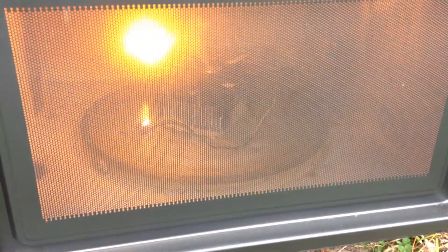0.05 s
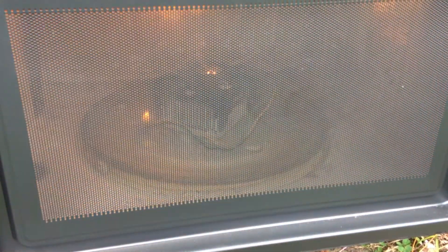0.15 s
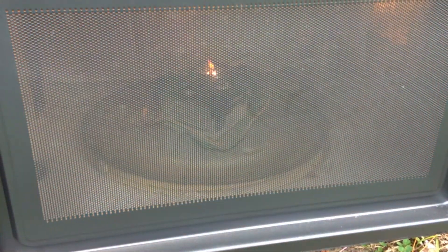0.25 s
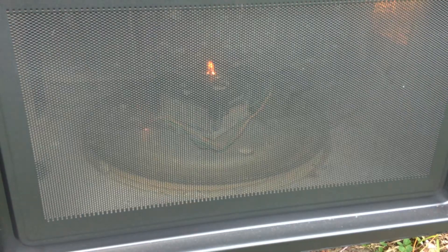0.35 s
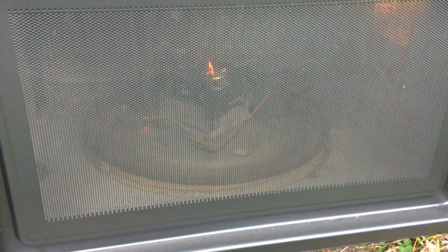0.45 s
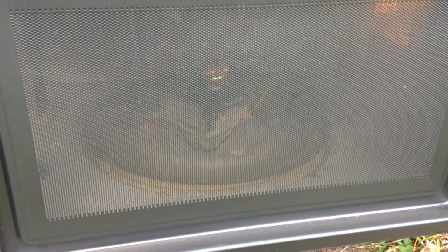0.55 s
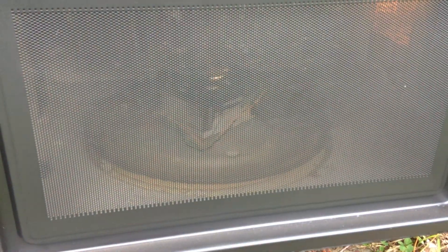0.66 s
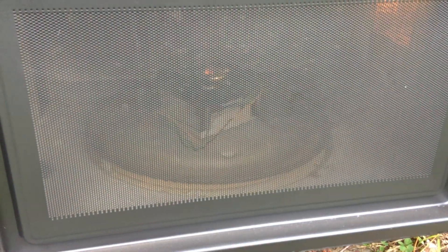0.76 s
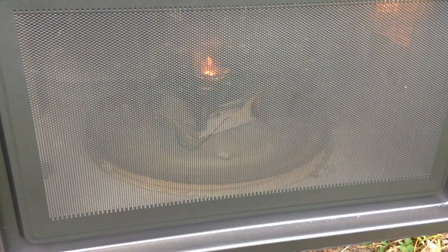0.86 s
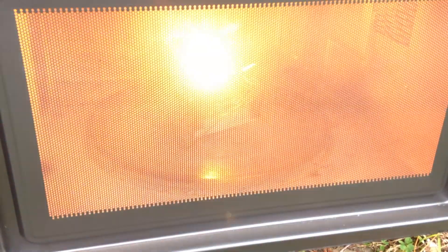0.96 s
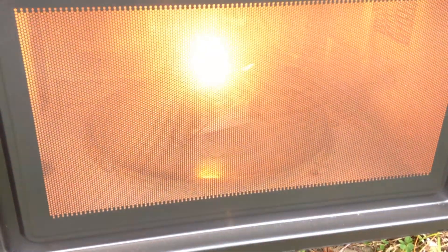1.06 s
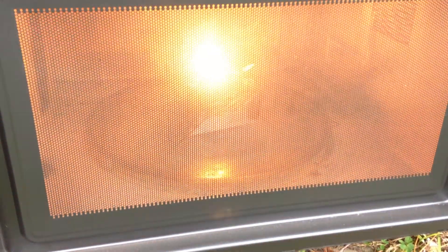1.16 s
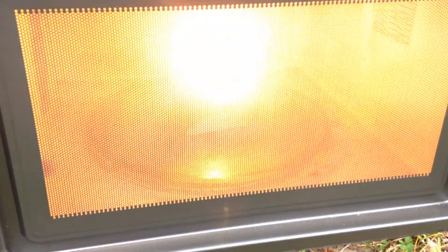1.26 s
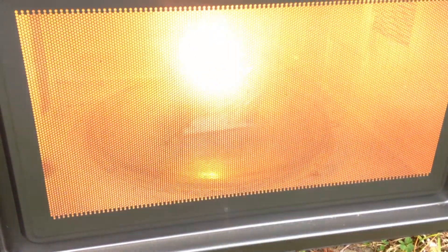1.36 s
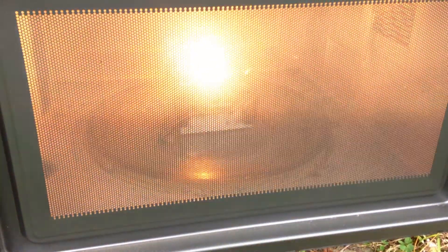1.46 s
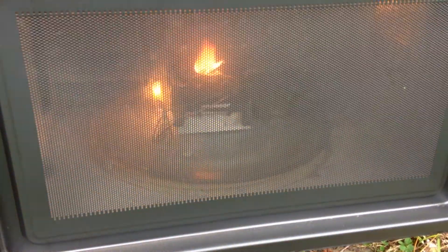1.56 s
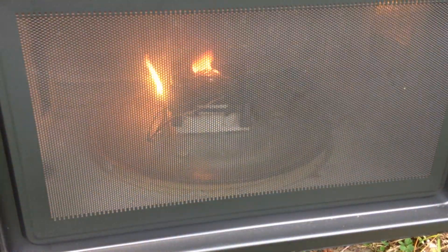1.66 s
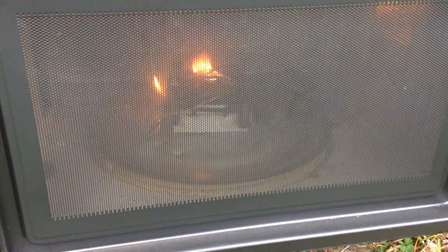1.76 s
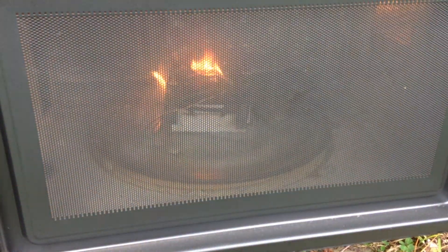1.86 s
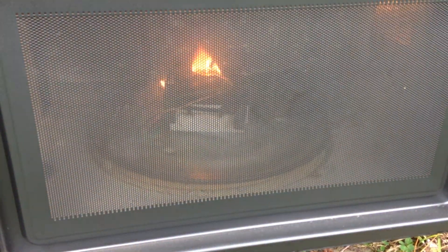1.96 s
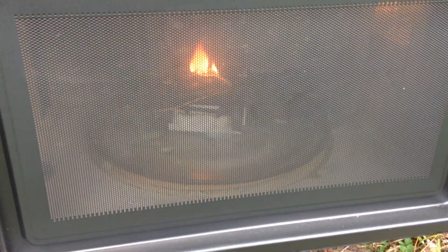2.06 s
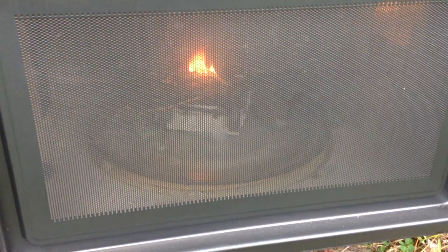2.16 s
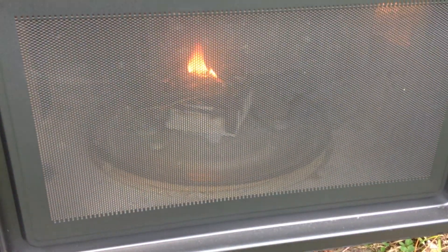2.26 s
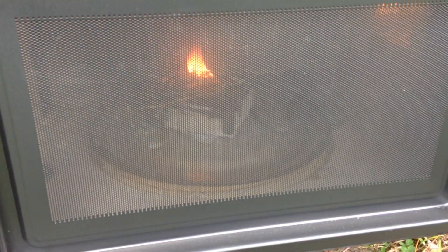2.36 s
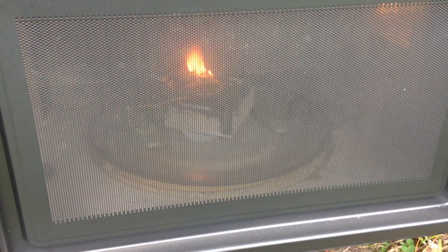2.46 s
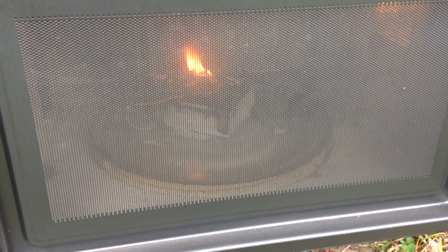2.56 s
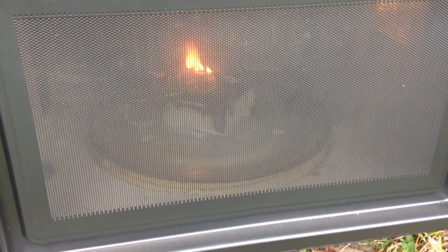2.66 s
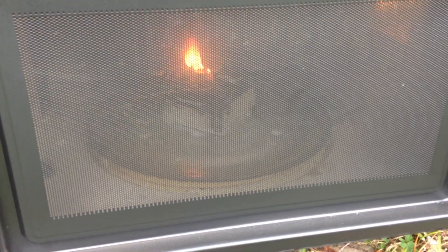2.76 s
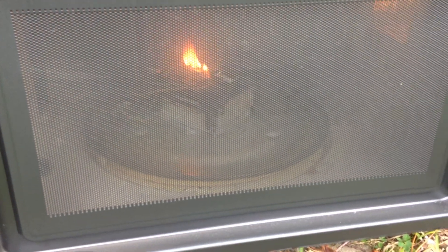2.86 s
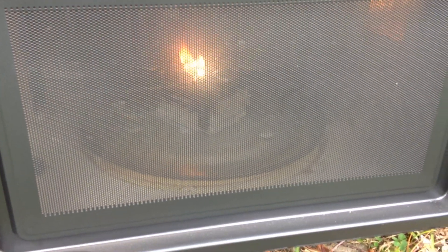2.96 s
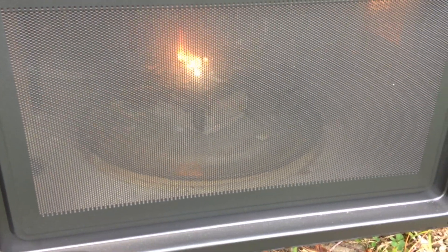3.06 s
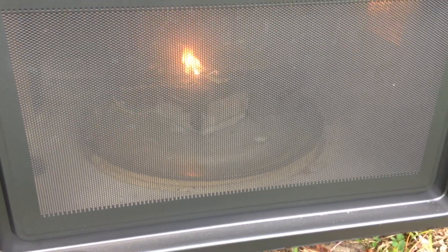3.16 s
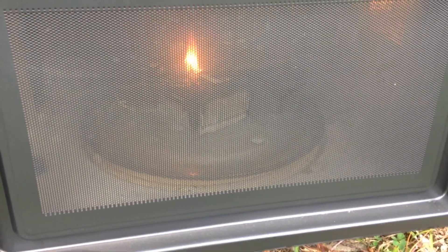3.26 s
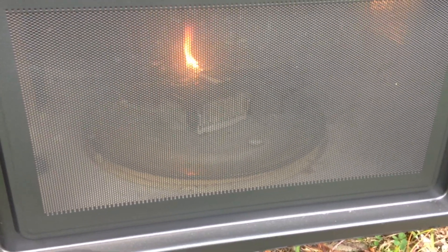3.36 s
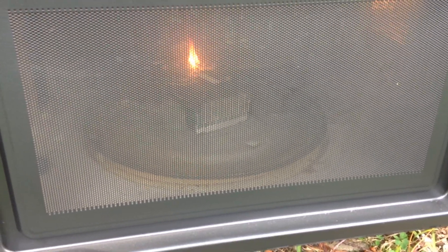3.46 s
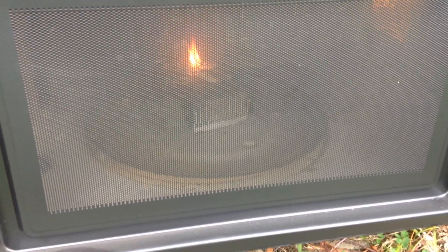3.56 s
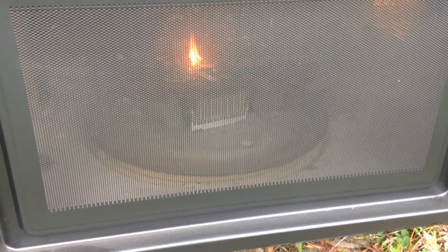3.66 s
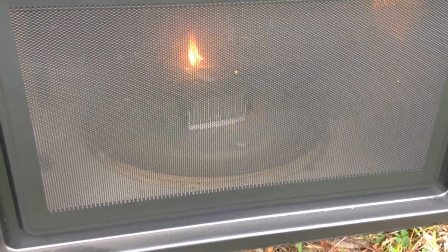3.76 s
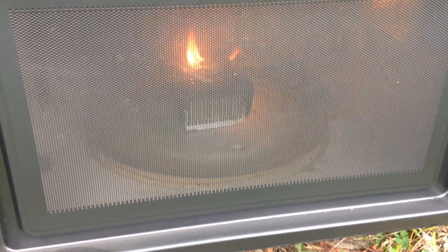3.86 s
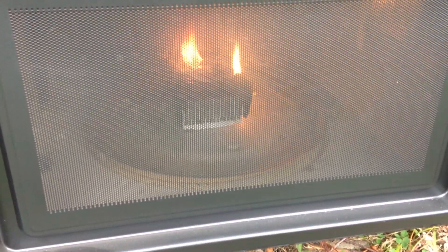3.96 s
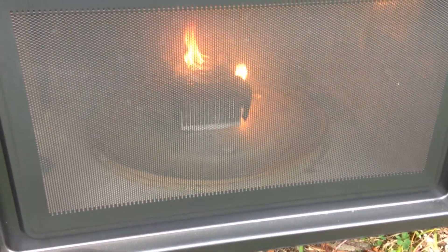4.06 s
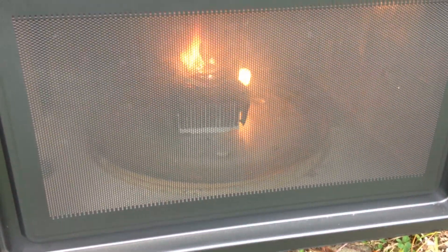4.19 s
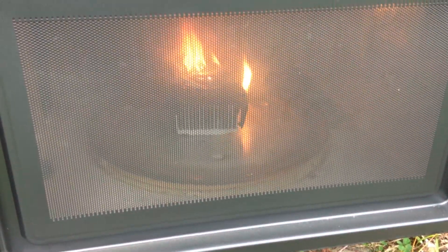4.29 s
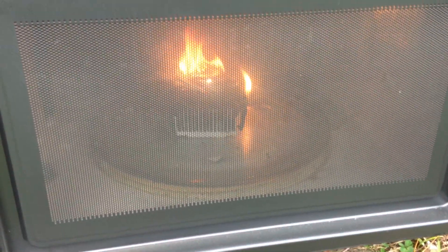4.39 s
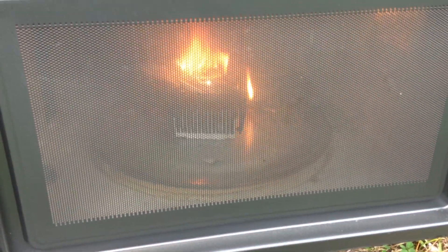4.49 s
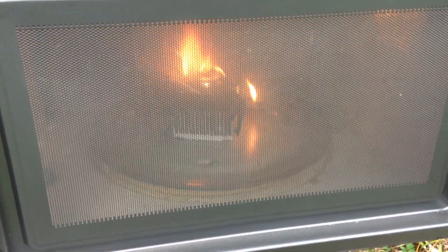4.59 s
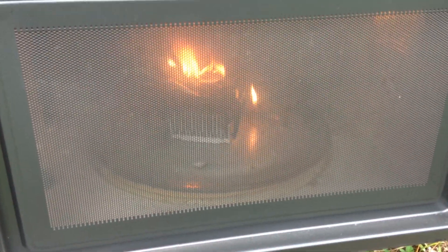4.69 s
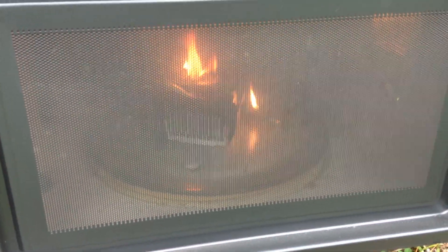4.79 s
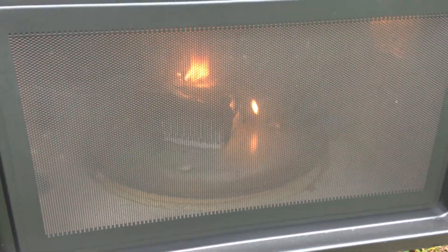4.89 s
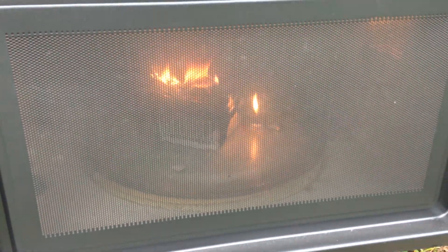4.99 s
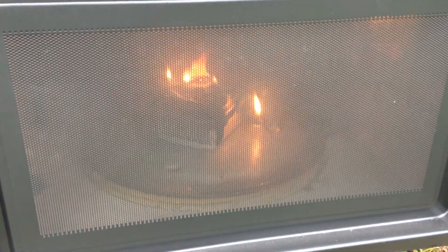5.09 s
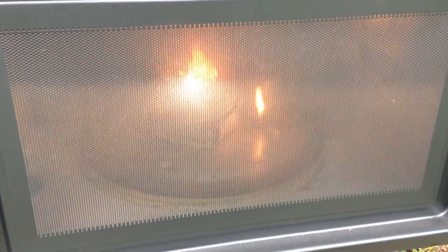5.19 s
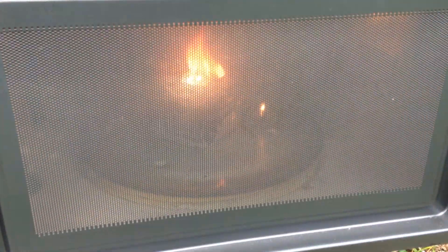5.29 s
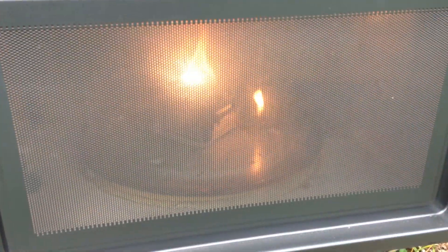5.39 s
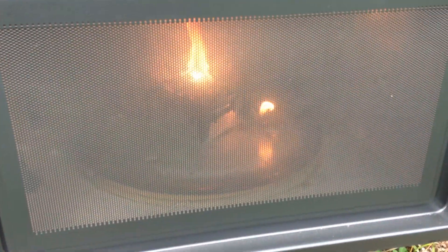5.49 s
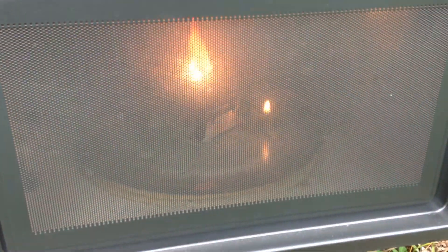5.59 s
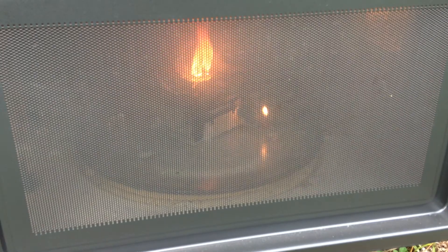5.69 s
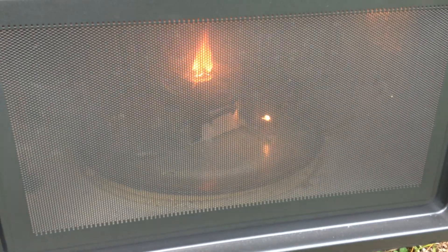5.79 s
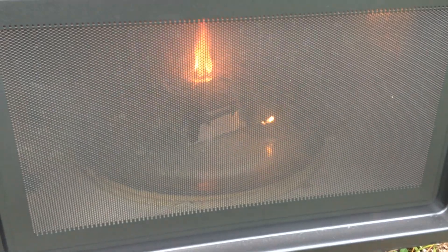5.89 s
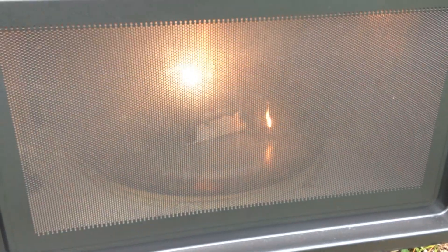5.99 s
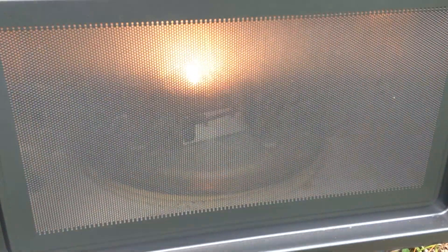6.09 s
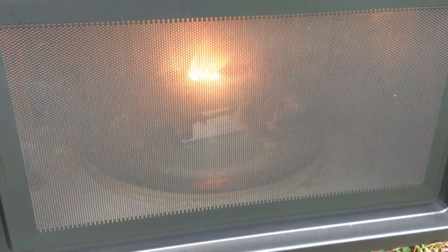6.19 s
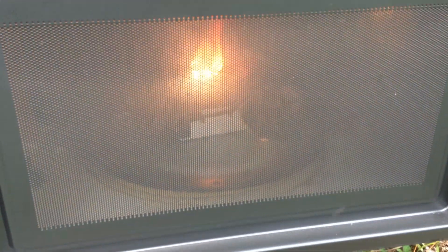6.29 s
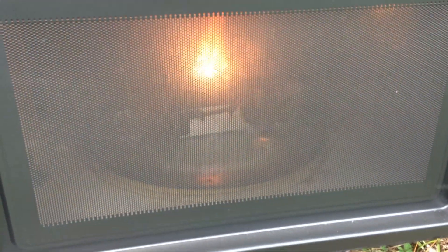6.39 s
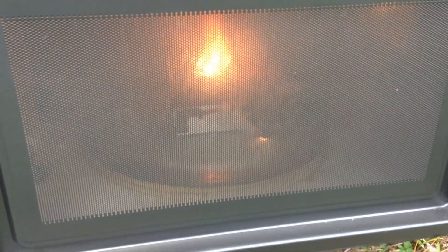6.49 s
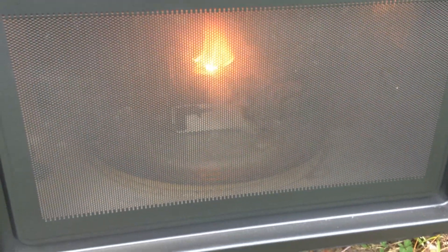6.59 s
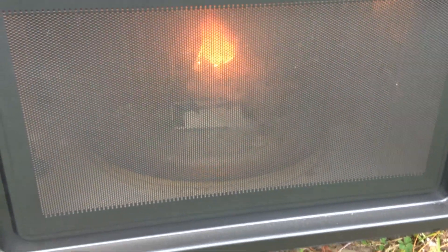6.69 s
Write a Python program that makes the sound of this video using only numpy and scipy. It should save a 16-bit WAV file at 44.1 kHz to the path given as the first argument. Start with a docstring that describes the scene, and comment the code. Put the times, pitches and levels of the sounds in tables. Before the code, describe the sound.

A microwave oven's low fan rumble under harsh buzzing electrical arcs that flare, fade, roar again, then shrink to faint sputters with one late snap.

```python
"""A microwave oven runs outdoors while metal inside it arcs and burns.
A fan rumbles and its blades whine faintly throughout. The arc opens with loud flares, fades at about
half a second, roars again from one second, then mostly sputters faintly; a burst at 5.2 s is the last strong one.
The arc is noise relit once in each mains cycle, ringing in a steel box. Its current loads the transformer,
whose hum and thumps rise and fall. Now and then gas ignites with a pop, a short dying swing."""
import sys
import numpy as np
from scipy import signal
from scipy.io import wavfile
from scipy.ndimage import uniform_filter1d

SR = 44100
rng = np.random.default_rng(int(sys.argv[2]) if len(sys.argv) > 2 else 0)


def log_audio(samples):
    """Write samples as a 16-bit WAV file to the path given in sys.argv[1]."""
    # one column per channel
    frames = np.atleast_2d(samples).T
    # limit to full scale, then quantise
    limited = np.clip(frames, -1, 1)
    pcm = np.round(limited * 32767).astype(np.int16)
    wavfile.write(sys.argv[1], SR, pcm)


N = 297278

MAINS_HZ = 60
STRIKE_TURN = .68  # share of a mains cycle at which the arc strikes


def gain_of(db):
    """Turns decibels into amplitude."""
    return 10 ** (np.asarray(db) / 20)


def evened(x):
    """Scales a signal to an rms (average strength) of 1."""
    return x / np.sqrt(np.mean(x ** 2) + 1e-20)


def read(points, hz):
    """Reads a curve between its points, on a log-frequency axis."""
    point_hz, value = np.transpose(points)
    return np.interp(np.log(hz + 1), np.log(point_hz + 1), value)


def colour(x, points):
    """Shapes the spectrum with a filter of energy 1 that responds as early as it can (minimum phase)."""
    hz = abs(np.fft.fftfreq(8192, 1 / SR))
    log_gain = np.log(gain_of(read(points, hz)))
    spectrum = np.exp(np.conj(signal.hilbert(log_gain)))
    taps = np.fft.ifft(spectrum).real[:4096]
    return signal.oaconvolve(x, taps / np.linalg.norm(taps))[:N]


def cycles():
    """Gives the number of the current strike, and the share of its cycle that has passed."""
    return np.divmod(np.arange(N) / SR * MAINS_HZ + 1 - STRIKE_TURN, 1)


def fan(patchy_db=1.5, level_db=-45.5):
    """Air noise of the fan over the faint outdoor hiss: random spectrum frames, drifting in patches."""
    # Shape of the air noise, set to its final level below: (frequency [Hz], relative level [dB per Hz])
    air_spectrum = [(25, -69), (60, -13.5), (105, -11), (140, 1.5), (170, -2), (230, -10.5), (340, -10),
                    (390, -17), (500, -15), (560, -23), (900, -25), (2000, -29.5), (3200, -39.5),
                    (6000, -43), (15800, -46)]
    frames = N // 512 + 5
    hz = np.fft.rfftfreq(2048, 1 / SR)
    real, imaginary, patches = rng.standard_normal((frames, len(hz), 3)).T
    patches = uniform_filter1d(patches, size=16, axis=0)  # smooth over frequency
    patches = evened(uniform_filter1d(patches, size=8, axis=1))  # and over time
    frame_db = read(air_spectrum, hz)[:, None] + patchy_db * patches
    spectrum = (real + 1j * imaginary) * gain_of(frame_db)
    noise = signal.istft(spectrum, nperseg=2048, noverlap=1536)[1][:N]
    return gain_of(level_db) * evened(noise)


def blade_tones():
    """Faint steady tones of the fan blades: plain sine waves."""
    # Pitch of each blade tone: (frequency [Hz])
    tone_hz = (513, 761)
    # Strength of each blade tone: (rms level [dB])
    tone_db = (-68.5, -71)
    t = np.arange(N) / SR
    total = np.zeros(N)
    for hz, db in zip(tone_hz, tone_db):
        turns = hz * t + rng.random()
        total += np.sqrt(2) * gain_of(db) * np.sin(2 * np.pi * turns)
    return total


def transformer(uneven=0.79, core_turn=.9, fourth_db=-23.5):
    """The core clenches twice a mains cycle; each uneven current pulse thumps the case once."""
    # Transformer under load: (time [s], hum level [dB], thump level before the unevenness [dB])
    load = [(0.0, -27, -31.5), (0.065, -33, -29.5), (0.11, -28, -46), (0.17, -31.5, -32.5),
            (0.27, -33.5, -41), (0.345, -39, -40), (0.39, -62, -54), (0.95, -62, -44.5),
            (1.03, -36.5, -36.5), (1.2, -33.5, -43), (1.3, -32.5, -30), (1.37, -26, -33),
            (1.57, -30.5, -38), (1.62, -42, -41.5), (1.85, -51.5, -54.5), (2.25, -57, -49),
            (2.66, -83, -57.5), (2.8, -62, -49.5), (3.83, -57, -64), (3.97, -47, -62), (4.55, -48.5, -55),
            (4.7, -57.5, -55), (5.2, -49.5, -51), (5.24, -41, -34.5), (5.3, -45.5, -45.5),
            (5.57, -45, -53.5), (5.7, -65, -58), (6.06, -49, -48.5), (6.4, -44, -52), (6.74, -52.5, -53.5)]
    # Tone of one thump: (frequency [Hz], relative level [dB])
    thump_spectrum = [(30, -6.5), (60, -3.5), (120, 5.5), (180, 5.5), (240, -2), (330, -14), (500, -19.5),
                      (800, -31.5), (2000, -55.5)]
    t = np.arange(N) / SR
    count, _ = cycles()
    time_s, hum_points, pulse_points = np.transpose(load)
    hum_db = np.interp(t, time_s, hum_points)
    pulse_db = np.interp(t, time_s, pulse_points)
    # the hum is twice the mains frequency, plus a weaker tone at four times the mains
    angle = 2 * np.pi * 2 * (MAINS_HZ * t - core_turn)
    hum = gain_of(hum_db) * (np.cos(angle) + gain_of(fourth_db) * np.cos(2 * angle))
    strike_size = 1 + uneven * rng.standard_normal(int(count[-1]) + 1)
    new_strike = np.diff(count, prepend=0) > 0
    pulses = strike_size[count.astype(int)] * new_strike * gain_of(pulse_db)
    # the root makes up for the silence between single-sample pulses
    thumps = np.sqrt(SR / MAINS_HZ) * colour(pulses, thump_spectrum)
    return np.sqrt(2) * hum - thumps


def pops(decay_s=0.0067, rise_s=0.0051):
    """Each puff of igniting gas pushes the door, which swings back a few times."""
    # Gas igniting in the box: (time [s], peak level [dB], swing frequency [Hz])
    puffs = [(0.094, -19.5, 120), (0.423, -34, 148), (0.848, -31, 173), (0.975, -23.5, 156),
             (3.567, -44, 129), (5.224, -27.5, 176), (5.243, -56, 126), (6.427, -33.5, 172)]
    t = np.arange(SR // 8) / SR
    total = np.zeros(N)
    for start_s, peak_db, hz in puffs:
        part = total[round(start_s * SR):][:len(t)]  # a view: changing it changes the total
        envelope = np.exp(-t / decay_s) * (1 - np.exp(-t / rise_s))
        push = envelope * np.sin(2 * np.pi * hz * t)
        part -= gain_of(peak_db) * push[:len(part)] / abs(push).max()
    return total


def echoes():
    """Dense wall echoes of energy 1, made of noise in which each band dies at its own speed."""
    # Ring of the box: (frequency [Hz], time to fall by 60 dB [s])
    wall_ring = [(500, 0.66), (2000, 0.16), (6000, 0.14), (14000, 0.043)]
    hz, frame_s, spectrum = signal.stft(rng.standard_normal(SR // 4), SR, nperseg=128)
    fall_db = -60 * frame_s / read(wall_ring, hz)[:, None]
    dense = signal.istft(spectrum * gain_of(fall_db), SR, nperseg=128)[1]
    return dense / np.linalg.norm(dense)


def cavity(x, drift_hz=14., direct_db=-7.5, echo_db=0.0, sound_m_per_s=343):
    """The drifting plasma meets ever-changing echoes; its spot sets which air modes of the box ring."""
    # Air modes of the steel box: (frequency [Hz], width [Hz])
    air_modes = [(500, 35), (980, 50), (1260, 14), (1352, 18), (1575, 40), (1895, 17), (2075, 35),
                 (2170, 35), (2440, 26), (2800, 50), (3040, 30), (3340, 28), (3575, 30), (3885, 35),
                 (4290, 45), (4480, 38), (4740, 35), (4960, 50), (5300, 40), (5580, 50), (6050, 50),
                 (6490, 45), (6900, 55), (7820, 60), (8170, 35), (8536, 30), (9560, 120), (10450, 150)]
    # How far each mode can stand over the echoes, in the same order: (level [dB])
    mode_db = (15, 18.5, 19, 17.5, 11, 24, 6.5, 10.5, 8, 6.5, 6, 6, 5.5, 9.5, 7.5, 9.5, 13, 4.5, 3, -12, 10,
               8.5, 8, 3.5, -5, 7.5, -1, 4.5)
    # Where the arc sits on the turning metal: (from time [s], path to the wall [m])
    arc_spots = [(0, .075), (.14, .5755), (.42, .4815)]
    # Low down few modes overlap, so echoes are weak: (frequency [Hz], relative level [dB])
    crowding = [(500, -8.5), (1500, -12.5), (2000, 0), (2800, -4), (4500, 0), (16000, -0.5)]
    t = np.arange(N) / SR
    ring_s = np.arange(SR // 4) / SR

    # three echo patterns take turns; their squared weights always add up to 1
    wet = np.zeros(N)
    for k in range(3):
        weight = np.sqrt(2 / 3) * np.cos(np.pi * (drift_hz * t + k / 3))
        wet += signal.oaconvolve(x * weight, echoes())[:N]
    out = colour(gain_of(direct_db) * x + gain_of(echo_db) * wet, crowding)

    rings = []
    for hz, width_hz in air_modes:
        fade = np.exp(-np.pi * width_hz * ring_s)
        rings.append(2 * np.pi * width_hz / SR * fade * np.sin(2 * np.pi * hz * ring_s))
    rings = np.array(rings)
    mode_hz = np.transpose(air_modes)[0]
    spot = np.searchsorted(np.transpose(arc_spots)[0], t, "right") - 1
    for k, (_, wall_m) in enumerate(arc_spots):
        # no ring where the arc sits at a still point (node) of the mode
        standing = abs(np.cos(2 * np.pi * mode_hz * wall_m / sound_m_per_s))
        response = (gain_of(mode_db) * standing) @ rings
        out += signal.oaconvolve(x * (spot == k), response)[:N]
    return out


def flare_strength(mid_s, chance):
    """Strength of body, rasp and sizzle at each strike; the strongest flare wins."""
    # Flares, levels before the overall arc level and the box: (start [s], burning time [s],
    # body when it lights [dB], body when it starts to die [dB], rasp over body [dB], sizzle over body [dB])
    flares = [ (0.0, 0.005, -30, -42.5, -5.5, -6), (0.032, 0.084, -29, -42, -2.5, -3.5),
              (0.149, 0.07, -36, -40, -2.5, -7), (0.23, 0.089, -42, -40.5, -5.5, -8.5),
              (0.331, 0.019, -32.5, -39.5, -3, -6.5), (0.482, 0.086, -62.5, -58, 5.5, 12),
              (0.611, 0.07, -59, -66.5, 2, 12.5), (0.729, 0.13, -62, -70, 3.5, 9),
              (0.849, 0.036, -59.5, -69, 5, 14), (0.909, 0.084, -56.5, -52, -2.5, 5.5),
              (1.015, 0.056, -35.5, -37.5, -5.5, -3.5), (1.067, 0.079, -46.5, -42, 4.5, 6.5),
              (1.177, 0.12, -41.5, -37.5, 3.5, 8.5), (1.33, 0.04, -44, -49, -5.5, -3.5),
              (1.383, 0.018, -40.5, -35, 1, -1), (1.45, 0.038, -51, -42, 5, 3.5),
              (1.498, 0.068, -38.5, -37, 1, 2), (1.575, 0.037, -38, -49.5, -2.5, -2),
              (1.667, 0.082, -53.5, -60, -2.5, 0), (1.77, 0.07, -63, -68, 3, 14),
              (1.85, 0.15, -59, -59, 1.5, 10), (2.47, 0.011, -66, -73, 3.5, 7),
              (2.555, 0.0073, -70, -72, 0, 7.5), (2.86, 0.052, -68, -62, -7, 3),
              (2.97, 0.051, -70, -56.5, 4.5, 11), (3.06, 0.13, -57, -64, 1, 6),
              (3.2, 0.1, -61, -61, 2.5, 8), (3.34, 0.1, -64, -70.5, 0, 8.5),
              (3.766, 0.0077, -52.5, -68.5, 7, 9), (3.83, 0.02, -69, -67, -0.5, 0),
              (3.94, 0.634, -64, -60, 0.5, 8.5), (4.561, 0.049, -67, -55.5, 2.5, 6.5),
              (4.719, 0.03, -59.5, -63, 3.5, 9), (5.232, 0.011, -36.5, -48, -5.5, -9.5),
              (5.256, 0.097, -51, -57, -4.5, -0.5), (5.39, 0.027, -53.5, -56, -2.5, -1),
              (5.428, 0.13, -54.5, -60.5, -0.5, 2), (6.014, 0.15, -56, -60.5, -1, 0.5),
              (6.216, 0.13, -58.5, -64, -1.5, -1), (6.5, 0.091, -70, -73, -4, 8.5),
              (6.66, 0.03, -63.5, -72, -4, 3)]
    # Body, rasp, sizzle; the bright part of the plasma cools first: (fall [dB/s])
    dying_speed = (454, 526, 557)
    catches_db_per_s = 1098  # a faint flare takes a few strikes to catch; a strong one is there at once
    faint_db = -57.5  # flares that light below this level are faint
    steady_db = -37  # flares that light below this level gutter (flicker)
    gutter = 0.081  # dB of flicker for each dB fainter
    strength = np.zeros((3, len(mid_s)))
    for start_s, burns_s, first_db, last_db, rasp_db, sizzle_db in flares:
        age_s = mid_s - start_s
        early_s = np.maximum(-age_s - .5 / MAINS_HZ, 0)
        body_db = np.interp(age_s, (0, burns_s), (first_db, last_db)) - catches_db_per_s * early_s
        dying_db = np.outer(dying_speed, np.maximum(age_s - burns_s, 0))
        flicker_db = gutter * max(steady_db - first_db, 0) * chance
        layers_db = (body_db + flicker_db, body_db + rasp_db + flicker_db / 2, body_db + sizzle_db)
        alight = (early_s == 0) | (first_db < faint_db)
        strength = np.maximum(strength, alight * gain_of(layers_db - dying_db))
    return strength


def arc(uneven_db=1., burn=0.17, glow=0.24, kindle=0.037, crackle_db=0.5, arc_level_db=-4.0):
    """Turbulent plasma noise that lights at each strike and fades over the cycle."""
    # Spectrum shapes of the three layers, each: (frequency [Hz], relative level [dB])
    body_spectrum = [(200, -37), (450, -2), (700, -9), (1000, -4), (1400, 2.5), (1900, -1.5), (2400, 1),
                     (3000, 3), (5000, -40.5)]
    rasp_spectrum = [(1500, -41.5), (2500, 4.5), (3200, 6), (5500, -1.5), (6800, -11.5), (10000, -41)]
    sizzle_spectrum = [(3000, -54.5), (5500, -20), (7000, -5), (8500, -2.5), (11000, -4), (13000, -9),
                       (16000, -7)]
    count, turn = cycles()
    count = count.astype(int)
    # each strike burns at one strength, read at the middle of its cycle
    mid_s = (np.arange(count[-1] + 1) + STRIKE_TURN - .5) / MAINS_HZ
    chance = rng.standard_normal((len(mid_s), 2))
    strength = flare_strength(mid_s, chance[:, 1])
    # arc_level_db sets the overall loudness of the arc
    strength = strength * gain_of(uneven_db * chance[:, 0] + arc_level_db)
    # burn and kindle are shares of a cycle; glow is a steady part
    lit = evened(glow + np.exp(-turn / burn) - np.exp(-turn / kindle))
    noise = evened(rng.standard_normal(N) * gain_of(crackle_db * rng.standard_normal(N)))
    hiss = np.zeros(N)
    for spectrum, level in zip((body_spectrum, rasp_spectrum, sizzle_spectrum), strength):
        hiss += colour(noise, spectrum) * level[count]
    return cavity(lit * hiss)


def scene():
    """Adds fan, blade tones, transformer, pops and arc before one microphone."""
    return (fan() + blade_tones() + transformer() + pops() + arc())[None]


def record(dry):
    """Limits the treble: a steep low-pass filter removes what lies above its edge."""
    edge_hz = 15550
    taps = signal.firwin(511, edge_hz, window=("kaiser", 9), fs=SR)
    return signal.oaconvolve(dry, taps[None], "same")


dry = scene()
out = record(dry)
log_audio(out)
```